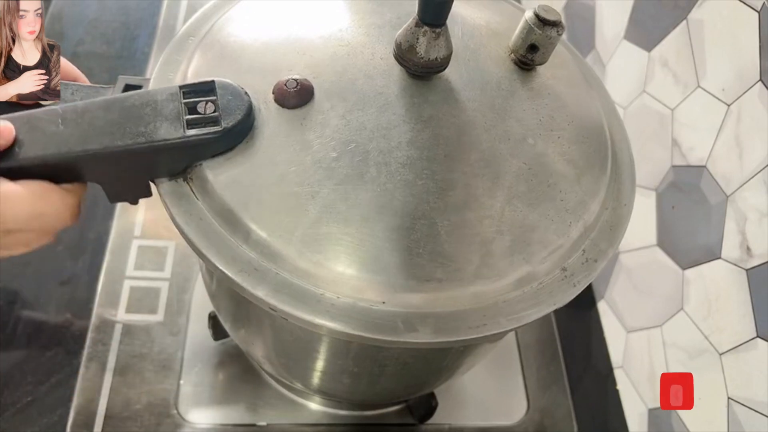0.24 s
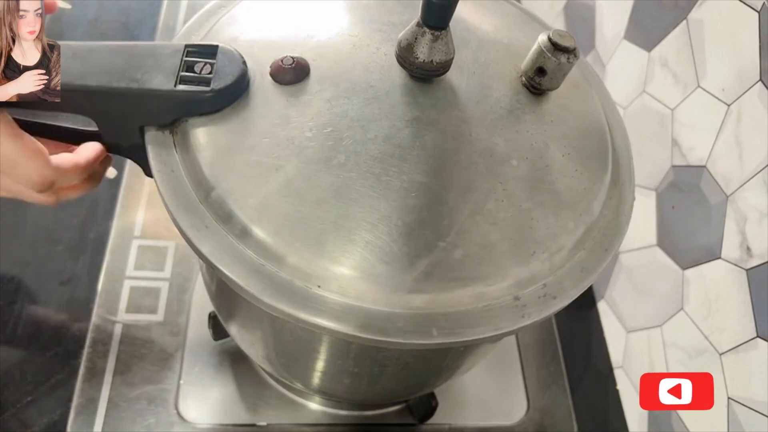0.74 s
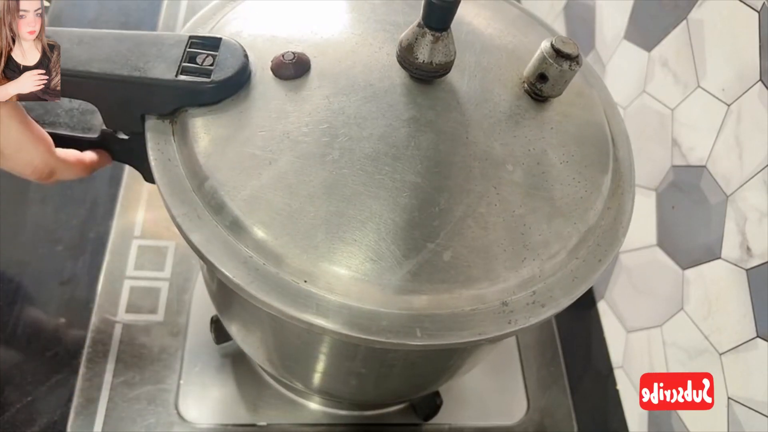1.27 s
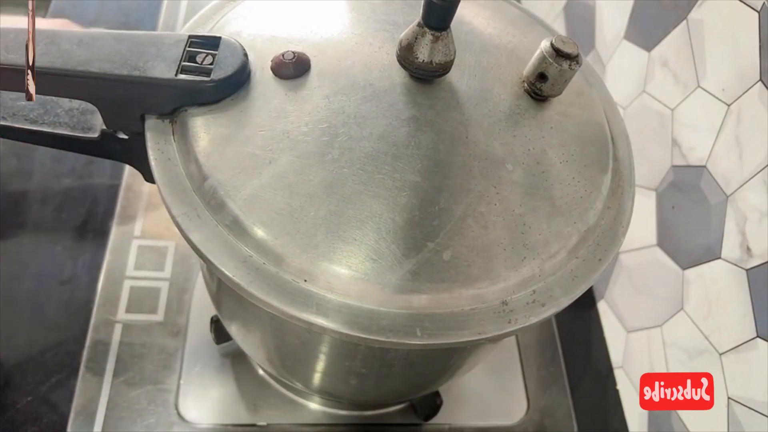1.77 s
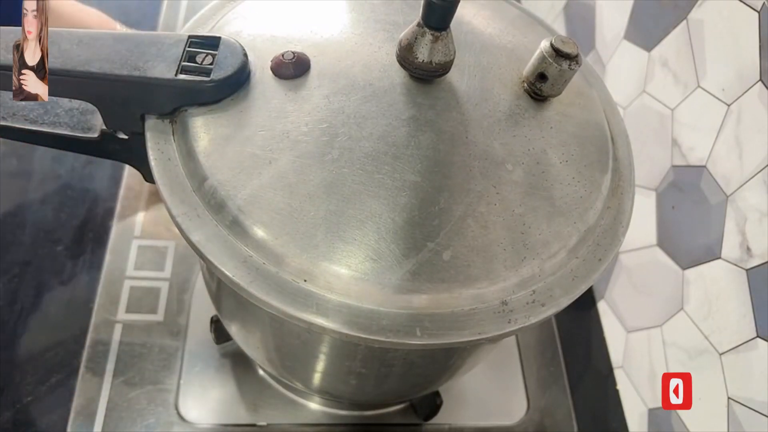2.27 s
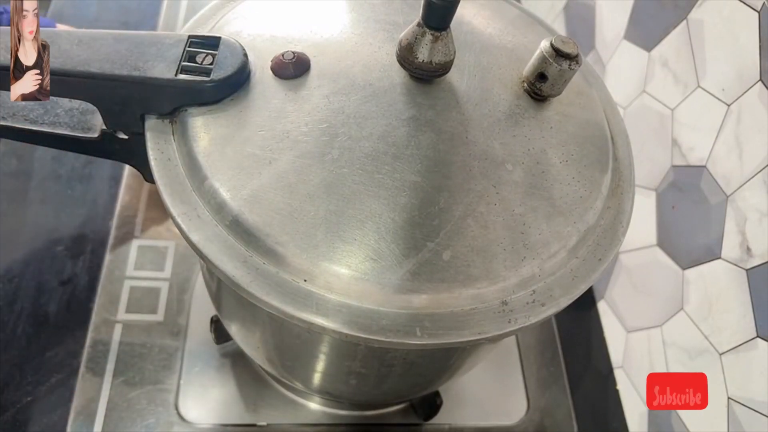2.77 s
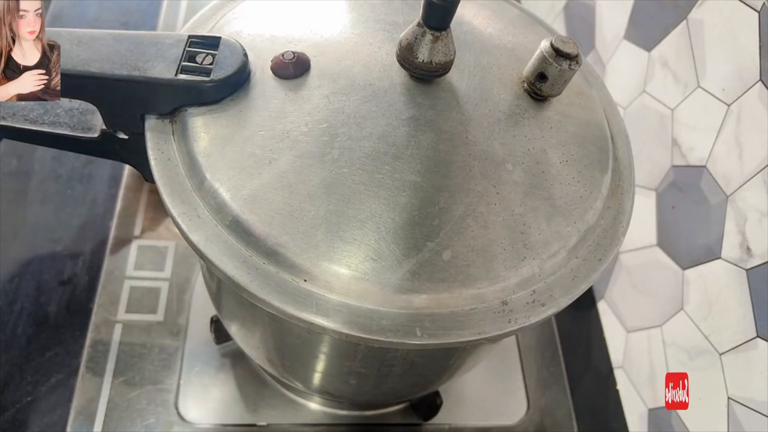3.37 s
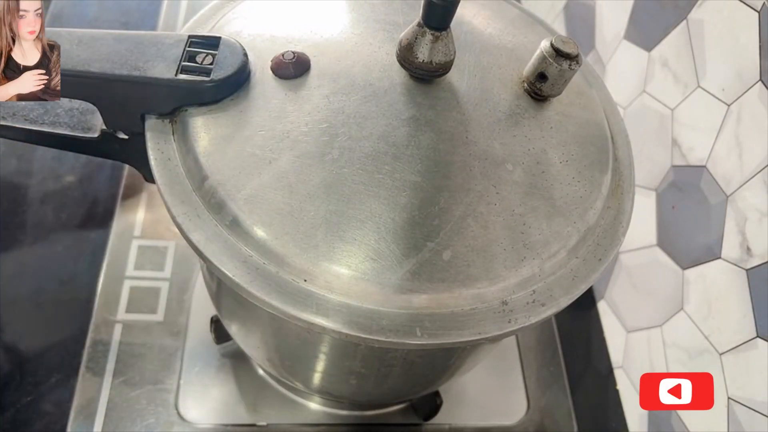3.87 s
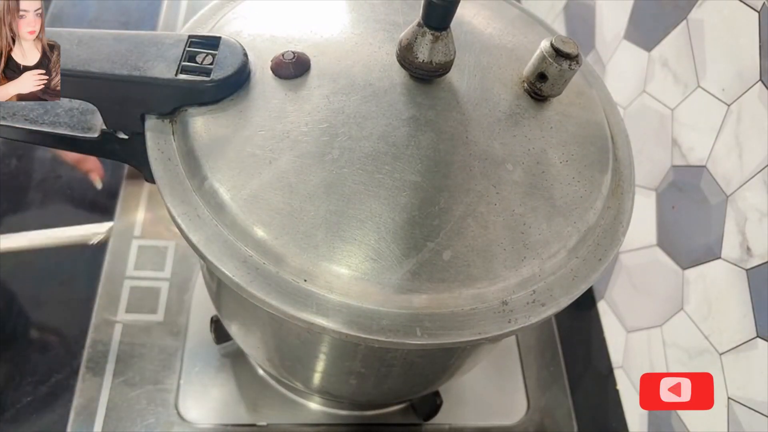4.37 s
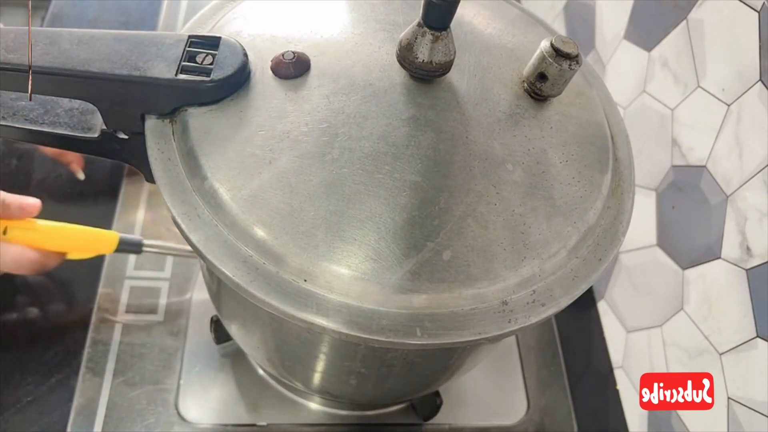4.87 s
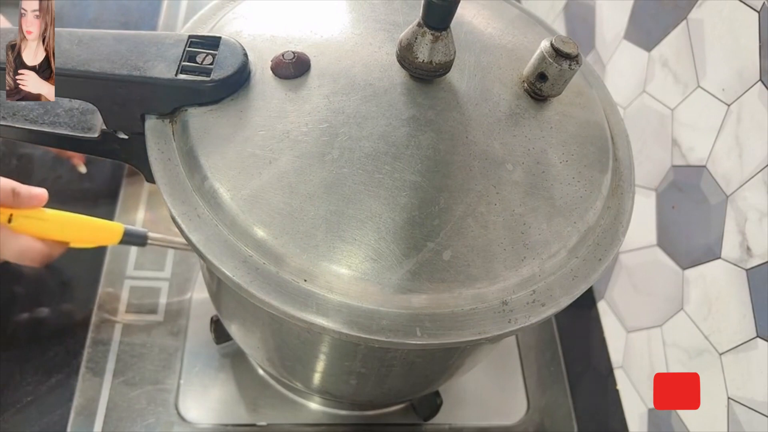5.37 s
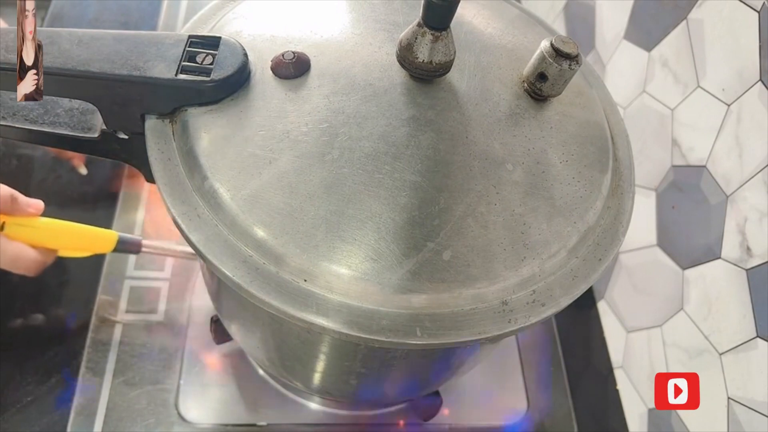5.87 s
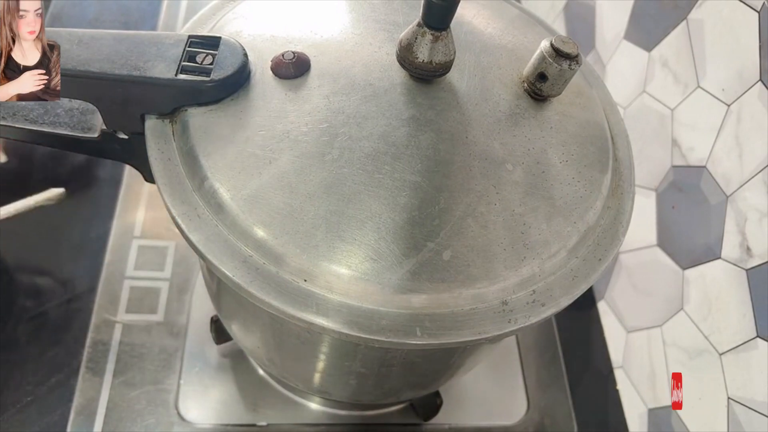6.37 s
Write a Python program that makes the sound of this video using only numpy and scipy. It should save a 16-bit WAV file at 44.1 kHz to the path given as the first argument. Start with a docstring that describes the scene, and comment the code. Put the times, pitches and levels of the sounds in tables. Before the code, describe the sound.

Over the soft hum of a kitchen fan, a pressure cooker is closed close to the microphone with a sharp click and a few dull knocks. A thin gas hiss begins, followed by light taps and one loud, brief clatter of steel utensils. Then a gas lighter scrapes and gives two sharp snaps, the second lighting the burner with a soft boom. The small tiled room adds a short echo.

```python
"""A tiled kitchen, pressure cooker on a gas hob. A fan hums throughout.
The lid rubs shut on its gasket, the latch clicks, the handles knock, the pot rocks and scuffs its stand.
The gas jet opens and hisses. Steel utensils tap, clank and rattle; the background dips, then returns.
A spring lighter scrapes and snaps twice; the burner catches with a whump.
Blows are a body's crack plus decaying modes in the room; rubbing, gas and flame are shaped noise."""
import sys
import numpy as np
from scipy import signal
from scipy.fft import rfft, irfft, next_fast_len
from scipy.io import wavfile

SR = 44100
rng = np.random.default_rng(int(sys.argv[2]) if len(sys.argv) > 2 else 0)


def transcribe(u):
    """Save the signal u as a 16-bit wav file named by the first command-line argument.

    u: samples, shape (n,) or (channels, n), limited to [-1, 1]; the rate is SR.
    q: integer samples, one column per channel.
    """
    v = np.clip(np.atleast_2d(u).T, -1, 1)
    q = np.round(v * 32767).astype(np.int16)
    wavfile.write(sys.argv[1], SR, q)


N = 292671
TIME = np.arange(N) / SR
AGE = np.arange(int(.8 * SR)) / SR  # s since a blow
IGNITION_S = 5.602

# fan and hob rumble spectrum: f/Hz, level/dB
RUMBLE_SPECTRUM = [(15, -53), (25, -29.5), (43, -7.5), (97, 6), (130, 1.5), (167, -14), (202, -17),
                   (226, -8), (390, -13), (467, -19), (552, -10), (626, -36), (700, -37.5), (910, -64),
                   (1540, -120)]
# friction and gas-spurt hiss spectrum: f/Hz, level/dB
HISS_SPECTRUM = [(1200, -16), (3000, 2.5), (5000, -2), (8000, -6.5), (13000, -14.5)]


def amp(db):
    """dB to gain."""
    return 10 ** (np.asarray(db) / 20)


def unit(x):
    """Scale to rms 1."""
    return x / np.sqrt(np.mean(x ** 2) + 1e-20)


def pulse(x):
    """Scale to the energy of 0.5 ms at full scale."""
    return x * np.sqrt(SR / 2000 / (np.sum(x ** 2) + 1e-20))


def along(points, hz):
    """Interpolate (f/Hz, value) points over log frequency."""
    f, v = np.transpose(points)
    return np.interp(np.log(hz + 1), np.log(f + 1), v)


def filtered(x, response):
    """Zero-phase filter of gain response(hz)."""
    size = next_fast_len(len(x) + SR // 2)
    return irfft(rfft(x, size) * response(np.fft.rfftfreq(size, 1 / SR)), size)[:len(x)]


def noise(spectrum):
    """Steady coloured noise, rms 1."""
    return unit(filtered(rng.standard_normal(N), lambda hz: amp(along(spectrum, hz))))


def crack(spectrum):
    """Dense body resonances after a sharp blow: minimum-phase impulse response."""
    size = 2 * len(AGE)
    level_db = np.maximum(along(spectrum, np.fft.rfftfreq(size, 1 / SR)), -70)
    cepstrum = irfft(np.log(amp(level_db)))
    cepstrum[1:size // 2] *= 2
    cepstrum[size // 2 + 1:] = 0
    return pulse(irfft(np.exp(rfft(cepstrum)))[:len(AGE)])


def ring(modes, detune=0):
    """Decaying modes, new strengths per blow; a shifting contact detunes them."""
    hz, db, t60_s = np.transpose(modes)[:, :, None]
    strength = amp(db + rng.normal(0, 1.5, hz.shape)) * rng.choice([-1, 1], hz.shape)
    hz = hz * (1 + detune * rng.standard_normal(hz.shape))
    return pulse(np.sum(strength * amp(-60 * AGE / t60_s) * np.sin(2 * np.pi * hz * AGE), axis=0))


def soften(x, cutoff_hz):
    """Low-pass: a soft contact excites little treble."""
    return signal.sosfilt(signal.butter(3, min(cutoff_hz, .45 * SR), fs=SR, output="sos"), x)


def in_room(x, scatter_t60_s, wet_db):
    """Early scatter off pot and hob, then a tail from the tiles."""
    # kitchen decay: f/Hz, t60/s
    decay = [(100, .5), (500, 0.5), (2500, 0.47), (6000, 0.48), (12000, 0.36)]
    near = rng.standard_normal(len(AGE)) * amp(-60 * AGE / scatter_t60_s)
    hz, t, bins = signal.stft(rng.standard_normal(len(AGE)), SR, nperseg=256)
    bins *= amp(-60 * t / along(decay, hz)[:, None])
    tail = signal.istft(bins, SR, nperseg=256)[1][:len(AGE)]
    tail *= 1 - np.exp(-AGE / 0.0029)
    response = near / np.linalg.norm(near) + amp(wet_db) * tail / np.linalg.norm(tail)
    return signal.fftconvolve(x, response)[:len(x)]


def add(out, start_s, x):
    """Mix x into out at start_s."""
    part = out[round(start_s * SR):][:len(x)]
    part += x[:len(part)]


def contacts(start_s, gap_s, jitter, count):
    """Times of slightly uneven contacts."""
    return start_s + gap_s * (np.arange(count) + jitter * rng.uniform(-1, 1, count))


def envelope(start_s, rise_s, hold_s, t60_s):
    """Quadratic rise, hold, exponential decay."""
    age = TIME - start_s
    return np.clip(age / rise_s, 0, 1) ** 2 * amp(-60 * np.maximum(age - rise_s - hold_s, 0) / t60_s)


def lull(depth_db, fall_s, recover_s, start_s=3.35):
    """Background level/dB: sinks after the clank, slowly returns."""
    return np.interp(TIME - start_s, [0, fall_s, fall_s + recover_s], [0, depth_db, 0])


def motor_line(centre_hz, half_width_hz):
    """Hum, rms 1: wandering pitch, near-steady level."""
    band = filtered(rng.standard_normal(N), lambda hz: 1 / (1 + ((hz - centre_hz) / half_width_hz) ** 2))
    analytic = signal.hilbert(band, next_fast_len(N))[:N]
    analytic /= np.std(analytic)
    return unit(analytic.real / np.sqrt(np.abs(analytic) ** 2 + .2))


def fan():
    """Rumble, moving air and motor hum; steady but for fade-in and lull."""
    # airflow spectrum: f/Hz, level/dB
    airflow = [(350, -26.5), (600, -4.5), (683, -15.5), (749, -7), (1490, -11), (1750, -14.5), (3140, -14),
               (4400, -23.5), (9370, -33), (12600, -37), (13500, -51.5)]
    # motor lines: f/Hz, half-width/Hz, level/dB
    lines = [(112, 23, -64), (195.1, 7.7, -58), (405.5, 14, -65.5), (498, 14, -74.5), (552.3, 4.5, -58),
             (595, 5.5, -70.5)]
    fade_db = -8 * np.clip(1 - TIME / 0.5, 0, 1)
    rumble_db = -44.5 + fade_db + lull(depth_db=-9.5, fall_s=0.44, recover_s=3.47)
    air_db = -59.5 + 0.49 * fade_db + lull(depth_db=-6.5, fall_s=0.74, recover_s=2.44)
    hum_db = 2 + .5 * fade_db + lull(depth_db=-8.5, fall_s=.5, recover_s=3.1)
    rush = amp(rumble_db) * noise(RUMBLE_SPECTRUM) + amp(air_db) * noise(airflow)
    hum = sum(amp(db) * motor_line(hz, half_width_hz) for hz, half_width_hz, db in lines)
    return rush + amp(hum_db) * hum


def rubbing():
    """Strokes speed up, slide and stop; uneven friction hisses, the hob rumbles."""
    # lid on gasket, then hands at the hob: t/s, length/s, hiss/dB, rumble/dB
    strokes = [(0.15, 0.73, -63, -56), (0.805, 0.12, -64, -50), (1.378, 0.27, -70, -54),
               (1.859, .2, -65.5, -43.5), (3.856, 0.29, -68, -63), (4.45, 0.87, -87, -48),
               (6.32, 0.12, -68, -56)]
    ramp_share, patchy_db = 0.34, 1.5
    hiss, rumble = np.zeros(N), np.zeros(N)
    for s, length_s, hiss_db, rumble_db in strokes:
        speed = np.clip(np.minimum(TIME - s, s + length_s - TIME) / (ramp_share * length_s), 0, 1)
        hiss += amp(hiss_db) * speed
        rumble += amp(rumble_db) * speed
    grip = amp(patchy_db * unit(soften(rng.standard_normal(N), cutoff_hz=13)))
    return hiss * grip * noise(HISS_SPECTRUM) + rumble * noise(RUMBLE_SPECTRUM)


def knock(db, cutoff_hz, thud_db):
    """A blow on the handles; it also jolts the stand."""
    # handle spectrum: f/Hz, level/dB
    handle_body = [(100, -5.5), (250, 0.5), (550, 4.5), (830, 1.5), (1100, -6.5), (1500, -11.5),
                   (2100, -10.5), (2800, -21), (6000, -33), (13000, -20.5)]
    # handle and stand modes: f/Hz, level/dB, t60/s
    handle_modes = [(772, 2, 0.042), (870, -1.5, 0.065)]
    stand_modes = [(58.7, -6, .25), (90.7, 3, 0.056), (168.7, -2.5, 0.069), (338, 4, 0.02)]
    handle = pulse(soften(crack(handle_body) + amp(-2) * ring(handle_modes), cutoff_hz))
    return in_room(amp(db) * handle + amp(thud_db) * ring(stand_modes), scatter_t60_s=0.1, wet_db=1)


def cooker():
    """Handles knock, the latch clicks home, the loose weight valve tings, the released pot rocks."""
    # handle knocks: t/s, level/dB, cutoff/Hz
    knocks = [(.444, -36, 400), (1.031, -31, 1090), (1.073, -46, 990), (1.1788, -21.5, 2600),
              (2.651, -34, 654)]
    # latch clicks and valve tings: t/s, level/dB
    clicks = [(.877, -22.5), (0.8793, -22)]
    tings = [(1.371, -61), (1.742, -44.5)]
    # latch spectrum: f/Hz, level/dB
    latch_body = [(150, -1), (550, -0.5), (820, 3.5), (1100, -4), (1800, -8), (2200, 2.5), (2700, -2),
                  (3300, 3), (3800, -6), (5000, -11.5), (6300, -27), (13000, -48)]
    # latch and valve modes: f/Hz, level/dB, t60/s
    latch_modes = [(2190, 9.5, 0.068), (2110, -2.5, 0.11), (3220, -3.5, 0.18)]
    valve_modes = [(5600, -16, 0.19), (8050, -13, 0.092), (9100, -2, 0.22), (11900, -22, 0.11)]
    out = np.zeros(N)
    for s, db in clicks:
        click = crack(latch_body) + amp(-4.5) * ring(latch_modes)
        add(out, s, amp(db) * in_room(click, scatter_t60_s=.03, wet_db=-4.5))
    for s, db, cutoff_hz in knocks:
        add(out, s, knock(db, cutoff_hz, thud_db=-33))
    for s in contacts(start_s=2.0, gap_s=0.043, jitter=0.189, count=4):  # rocking
        add(out, s, knock(db=-35.5, cutoff_hz=430, thud_db=-25.5))
    for s, db in tings:
        add(out, s, amp(db) * in_room(ring(valve_modes), scatter_t60_s=0.0053, wet_db=-4))
    return out


def scuffs():
    """The pot's base scrapes its stand: short, dull swells."""
    # scrapes: t/s, level/dB
    scrapes = [(2.085, -53), (2.455, -50)]
    # scrape spectrum: f/Hz, level/dB
    spectrum = [(150, 1), (400, 7), (700, -3), (1200, 2), (3200, -4), (4500, -28), (13000, -36)]
    swells = sum(amp(db) * envelope(s, rise_s=0.019, hold_s=0.015, t60_s=0.56) for s, db in scrapes)
    return swells * noise(spectrum)


def gas():
    """The jet spurts as the tap opens, then hisses; quieter in the lull and once alight."""
    # jet spectrum: f/Hz, level/dB
    jet = [(2000, -22), (5300, -12), (5800, -0.5), (6150, -2), (6600, -16.5), (9000, -24.5), (11300, -16),
           (13500, -29)]
    open_s, turn_s, alight_db = 2.46, .06, -6.5
    spurt = amp(-56.5) * envelope(open_s, rise_s=0.018, hold_s=.005, t60_s=.3) * noise(HISS_SPECTRUM)
    flow = np.clip((TIME - open_s) / turn_s, 0, 1)
    hiss_db = -66.5 + lull(depth_db=-10.5, fall_s=0.86, recover_s=2.5) + alight_db * (TIME > IGNITION_S)
    return spurt + flow * amp(hiss_db) * noise(jet)


def utensil_taps():
    """Light taps: soft ones knock hollow, hard ones tick."""
    # taps: t/s, level/dB, ring/dB, hardness 0-1
    taps = [(3.0097, -23.5, -3, 0.56), (3.0698, -25.5, -17.5, 1), (3.1141, -15.5, -10, 1),
            (3.1682, -13, -10.5, 0.05), (3.299, -22, -18, .3), (3.3137, -14.5, -22, .25),
            (4.42, -48, 2, 0.4), (5.2418, -39, -19.5, .8), (6.618, -43, -19, 0.3)]
    # utensil and edge-tick spectra: f/Hz, level/dB
    body = [(300, -21), (600, -18), (1100, -11.5), (1500, -4), (1850, -5.5), (2200, -2), (2700, -4.5),
            (3600, -8), (4500, -15), (5400, -12), (6500, -16.5), (10000, -20), (13500, -26)]
    edge = [(2000, -32), (5000, 1), (8000, 1), (12000, 3.5), (13500, -15)]
    # utensil and hollow-knock modes: f/Hz, level/dB, t60/s
    modes = [(1767, -1, 0.11), (1940, -2.5, .04), (2350, -5, .045), (2690, -4, 0.024)]
    hollow_modes = [(650, -5, 0.04), (741, 3.5, 0.031), (770, 1.5, 0.028), (900, -4, 0.027)]
    out = np.zeros(N)
    for s, db, ring_db, hardness in taps:
        hollow = amp(-35 * hardness) * ring(hollow_modes)
        tick = amp(-1.5 - 20.5 * (1.5 - hardness)) * crack(edge)
        blow = crack(body) + amp(ring_db) * ring(modes) + hollow + tick
        add(out, s, amp(db) * in_room(blow, scatter_t60_s=.035, wet_db=-2.5))
    return out


def clank(ring_db, punch_db):
    """Steel on steel: the contact damps its own ring and punches the hob top."""
    # spectra of the steel and the yielding hob top: f/Hz, level/dB
    steel_body = [(70, -51), (120, -17.5), (335, -8.5), (520, -8), (720, -4.5), (980, -6.5), (1150, -12),
                  (1500, -2.5), (1950, -16), (2420, 0.5), (2800, -10.5), (3400, -7), (6000, -14.5),
                  (8800, -26.5), (10200, -23.5), (13500, -35)]
    hob_top = [(120, -25), (330, 0), (560, 0), (900, -18), (2000, -48)]
    # steel modes: f/Hz, level/dB, t60/s
    steel_modes = [(746, -14, .3), (1130, -6, 0.56), (1200, -9.5, 0.26), (1248, -4.5, 0.18),
                   (1380, -3.5, .26), (1454, -8, 0.58), (1453, -1.5, 0.073), (1540, -5, 0.52),
                   (1630, -12, 0.23), (1825, -13, 0.47), (2320, -17, 0.25), (2720, -18.5, 0.36),
                   (3030, -17, .28), (3420, -17, 0.14), (3698, -18.5, .28), (4120, -17, 0.3),
                   (4900, -22.5, .2)]
    damped = pulse(ring(steel_modes, detune=.009) * np.exp(-AGE / 0.032))
    steel = in_room(crack(steel_body) + amp(ring_db) * damped, scatter_t60_s=0.017, wet_db=-4.5)
    punch = in_room(crack(hob_top), scatter_t60_s=0.035, wet_db=-5)
    return steel + amp(punch_db) * punch


def utensil_clatter():
    """Steel clanks, bounces and rattles to rest."""
    # hard contacts: t/s, level/dB
    clanks = [(3.3443, -2), (3.347, -3), (3.3557, -5), (3.4247, -12.5)]
    rattle_s, rise_s, slope_db_per_s = 3.368, .012, 187
    out = np.zeros(N)
    for s, db in clanks:
        add(out, s, amp(db) * clank(ring_db=-9.5, punch_db=-19))
    for s in contacts(rattle_s, gap_s=.0095, jitter=.2, count=13):
        db = -7.5 - slope_db_per_s * abs(s - rattle_s - rise_s)
        build_up = np.interp(s - rattle_s, [0, rise_s], [.5, 1])
        add(out, s, amp(db) * build_up * clank(ring_db=1, punch_db=-23))
    return out


def lighter():
    """The plunger scrapes; the spring hammer snaps twice and rings the steel tube."""
    # scrape and snaps: t/s, level/dB, scatter t60/s, cutoff/Hz, grip knock/dB
    strokes = [(4.75, -23.5, 0.36, 7350, -1.5), (5.0074, -9.5, 0.016, 14800, -16),
               (5.588, -9, 0.035, 16800, -34)]
    # mechanism and grip spectra: f/Hz, level/dB
    mechanism = [(200, -29), (700, -21), (1000, -7), (1500, 2.5), (1900, 1.5), (2400, 5), (3400, -1),
                 (4100, -6), (5400, 1.5), (6400, -3), (7100, -0.5), (9200, -5.5), (10300, 6.5), (11300, -4),
                 (13500, -7)]
    grip = [(100, -16), (270, 8), (450, -5), (800, -3.5), (1300, -11.5), (3000, -50)]
    # tube modes: f/Hz, level/dB, t60/s
    tube_modes = [(3490, -2, 0.035), (5380, 1, 0.032), (10100, -10, 0.052), (10300, -4, 0.07)]
    out = np.zeros(N)
    for s, db, scatter_t60_s, cutoff_hz, knock_db in strokes:
        blow = crack(mechanism) + amp(-12.5) * ring(tube_modes) + amp(knock_db) * crack(grip)
        add(out, s, amp(db) * in_room(soften(blow, cutoff_hz), scatter_t60_s, wet_db=-1.5))
    return out


def burner():
    """Ignition: flame rushes round the burner, swelling air booms under the pot."""
    # flame spectra: f/Hz, level/dB
    rush_spectrum = [(100, -25), (200, 2), (335, 3.5), (405, 0.5), (480, -7.5), (570, -1.5), (690, -19.5),
                     (900, -12.5), (1150, -25.5), (2500, -57)]
    thump_spectrum = [(18, -27.5), (45, -2), (65, 3), (100, 0.5), (140, 2), (190, -3), (300, -48)]
    # air resonances under the pot and in the hob: f/Hz, level/dB
    cavity = [(64.5, 3), (140, 4.5)]
    rush = envelope(IGNITION_S, rise_s=0.087, hold_s=0.015, t60_s=.4) * noise(rush_spectrum)
    boom = unit(sum(amp(db) * np.sin(2 * np.pi * (hz * TIME + rng.random())) for hz, db in cavity))
    swell = envelope(IGNITION_S, rise_s=0.13, hold_s=0.018, t60_s=0.45)
    thump = swell * unit(boom + noise(thump_spectrum))
    return amp(-21.5) * rush + amp(-17.5) * thump


def scene():
    """Mono mix, heard above the hob."""
    handling = rubbing() + scuffs() + cooker() + utensil_taps() + utensil_clatter()
    return (handling + lighter() + gas() + burner() + fan())[None]


def record(dry):
    """Soft-clip the peaks, then band-limit."""
    ceiling, top_hz = .85, 13300
    rounded = dry[0] / (1 + np.abs(dry[0] / ceiling) ** 6) ** (1 / 6)
    return filtered(rounded, lambda hz: np.clip((top_hz - hz) / 200 + .5, 0, 1))[None]


dry = scene()
out = record(dry)
transcribe(out)
```